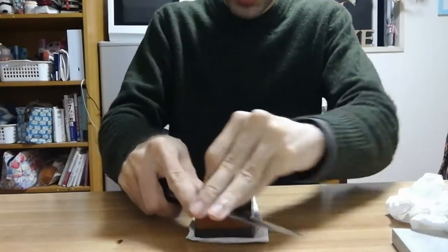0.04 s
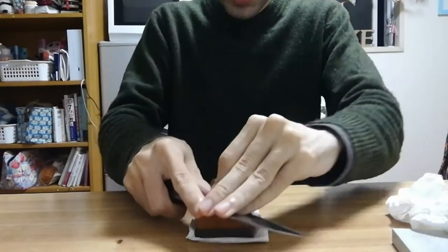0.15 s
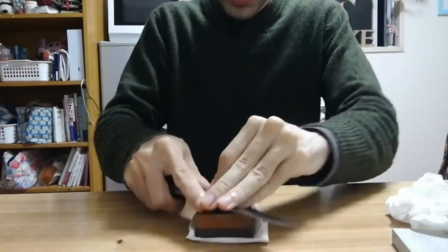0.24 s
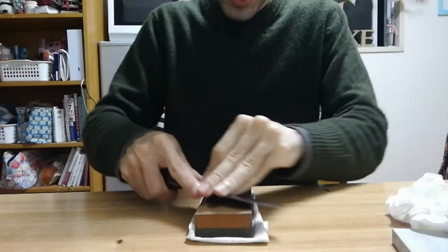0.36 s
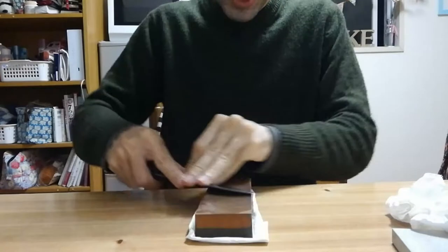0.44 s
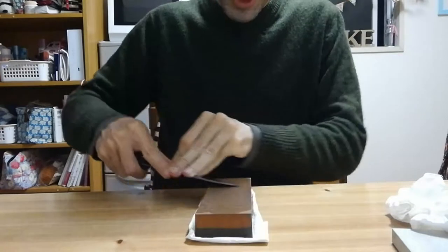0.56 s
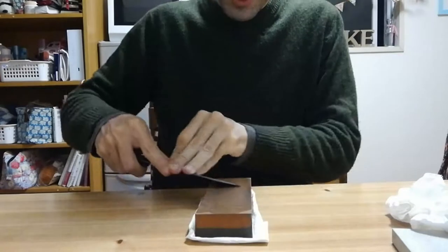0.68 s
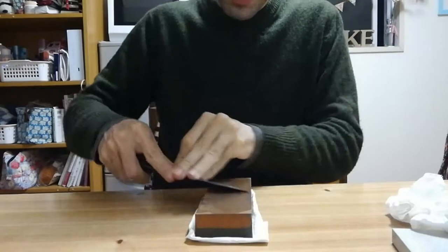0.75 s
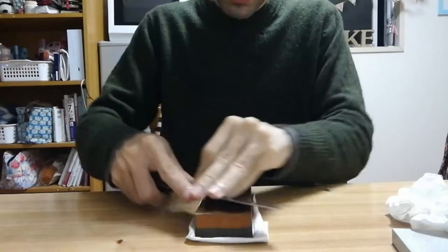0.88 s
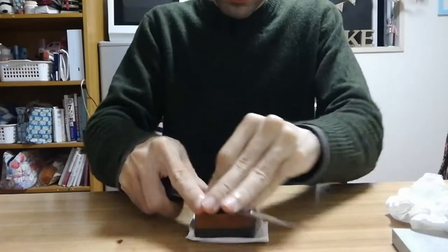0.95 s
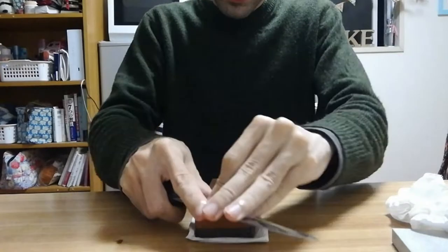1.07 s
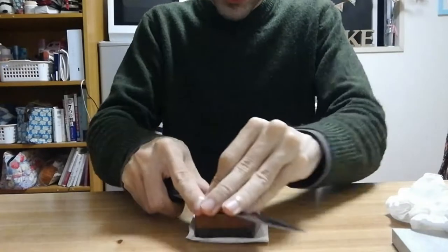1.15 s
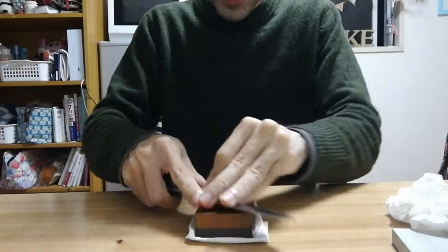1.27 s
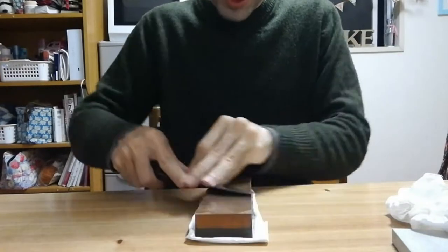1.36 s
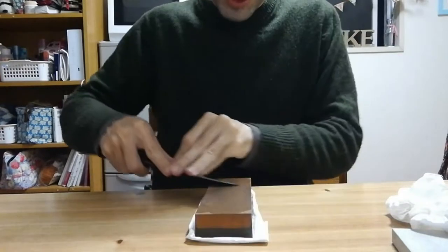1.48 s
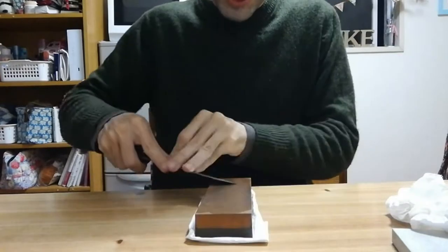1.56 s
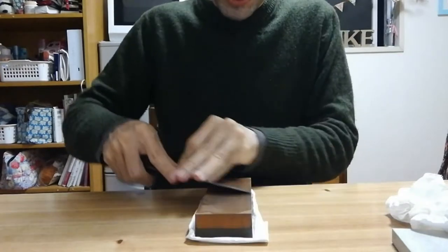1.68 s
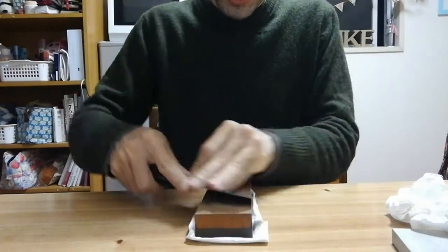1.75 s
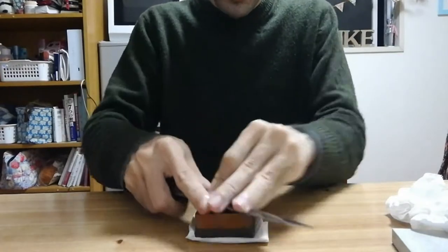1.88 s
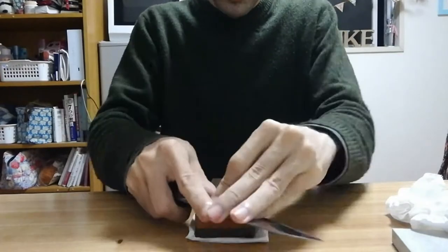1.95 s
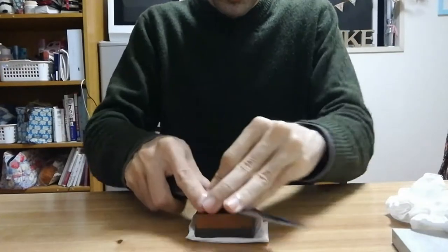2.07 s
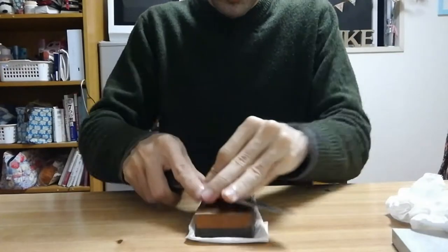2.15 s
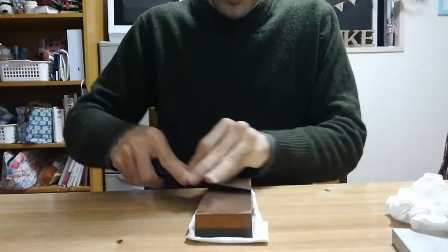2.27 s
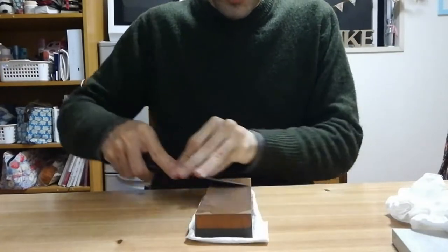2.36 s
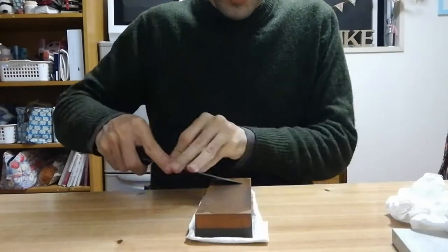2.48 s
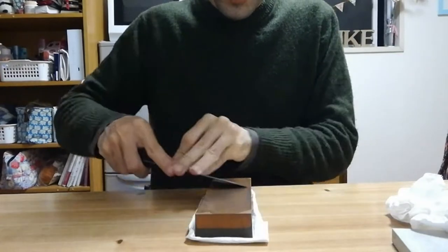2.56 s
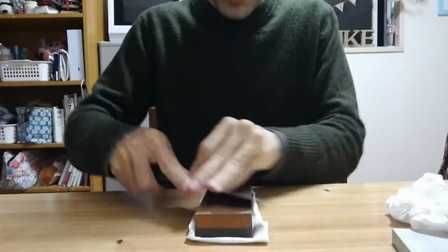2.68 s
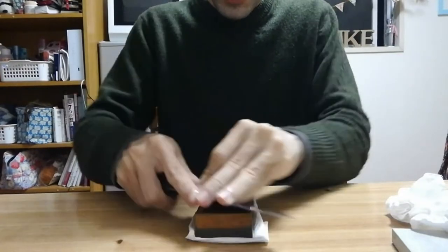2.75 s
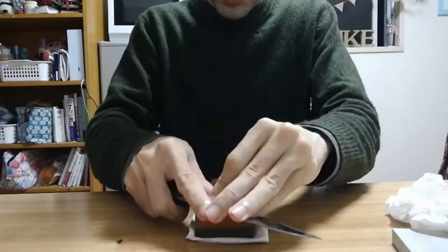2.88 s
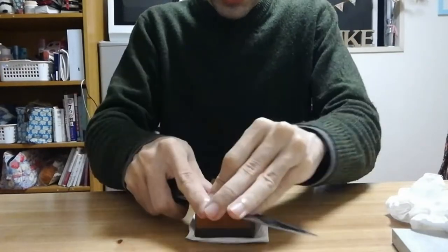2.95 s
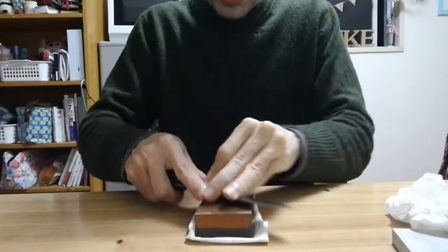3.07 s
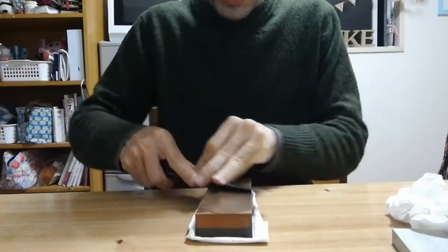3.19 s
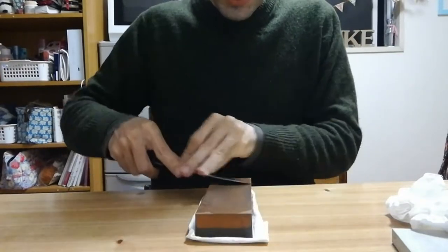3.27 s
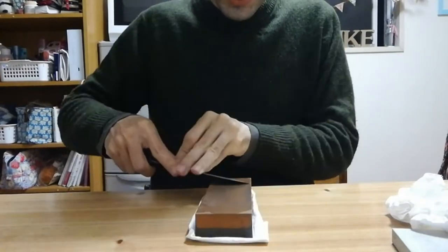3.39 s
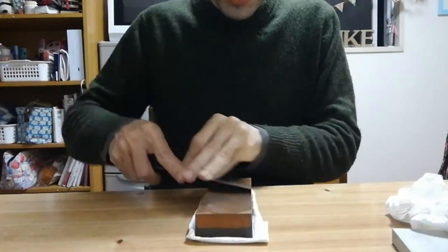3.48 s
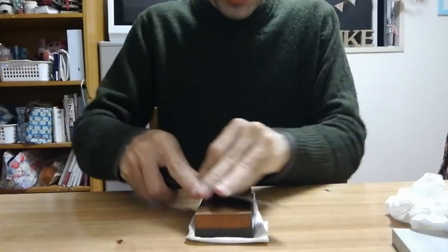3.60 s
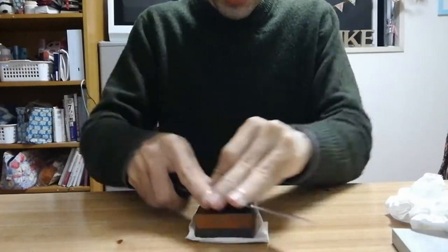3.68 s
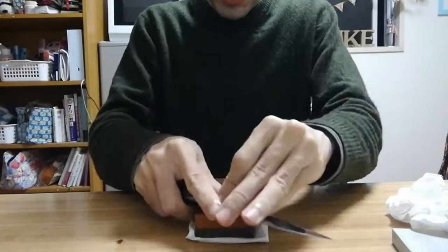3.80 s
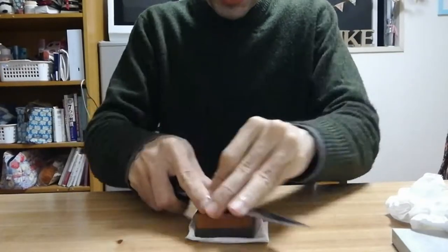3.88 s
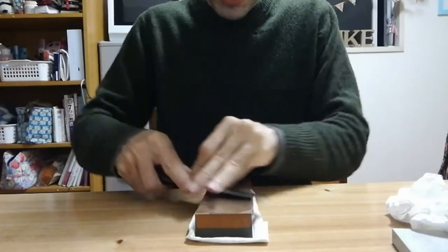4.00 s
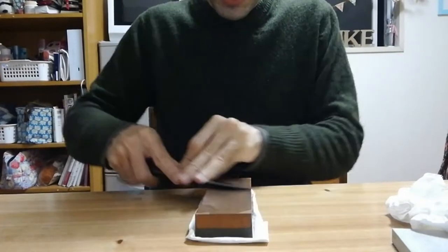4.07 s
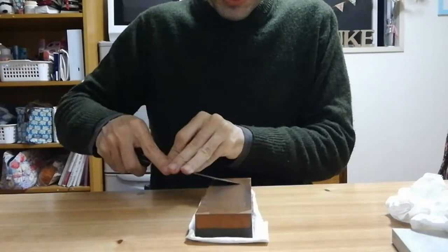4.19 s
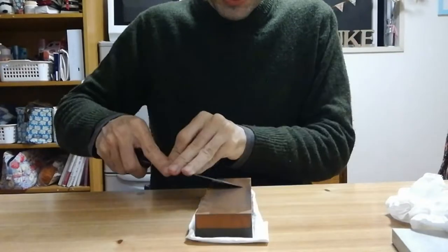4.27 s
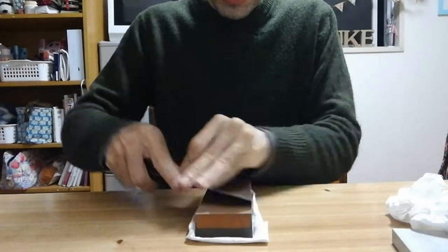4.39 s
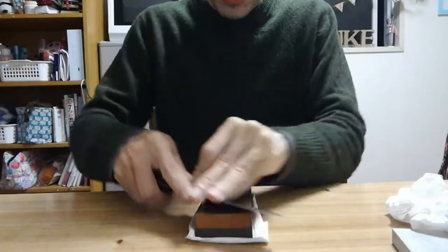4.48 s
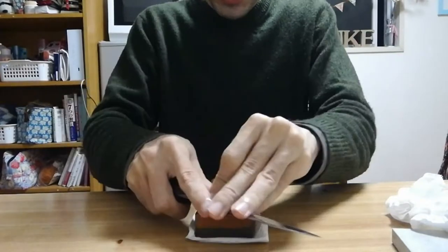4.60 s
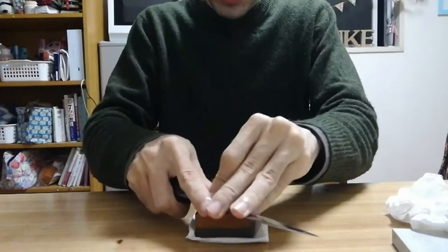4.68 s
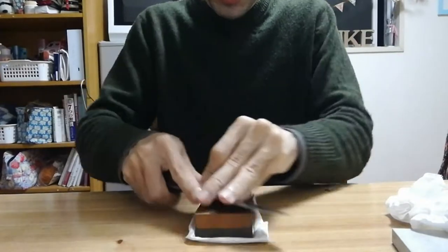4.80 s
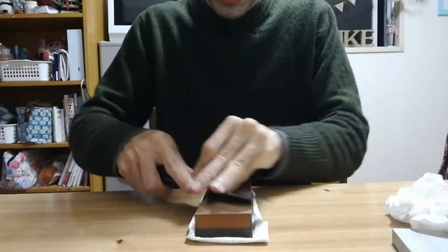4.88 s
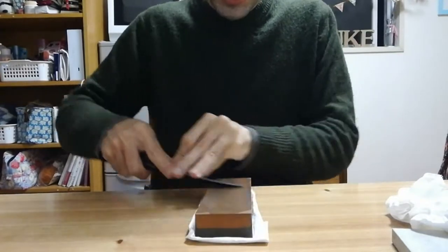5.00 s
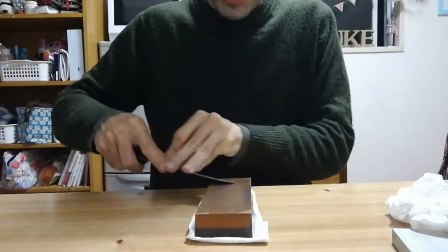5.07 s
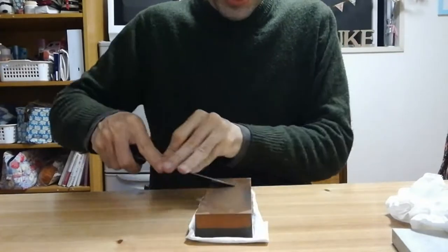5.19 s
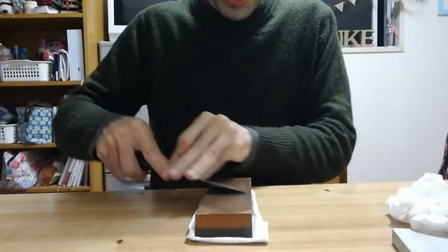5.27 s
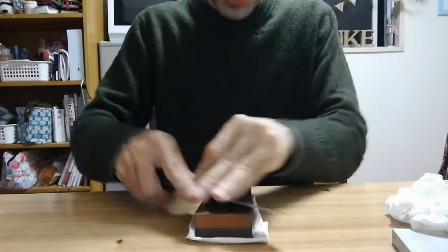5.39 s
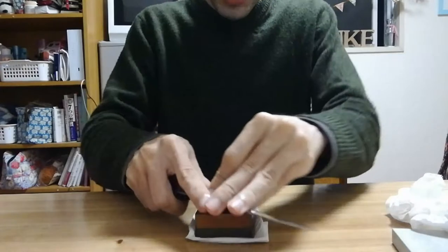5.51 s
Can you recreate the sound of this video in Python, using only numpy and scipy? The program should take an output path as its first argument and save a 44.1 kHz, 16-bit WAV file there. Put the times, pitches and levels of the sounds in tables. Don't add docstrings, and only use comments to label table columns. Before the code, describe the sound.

Close, hissy metallic strokes of a knife on a whetstone, about two per second, with short sliding ringing tones in a quiet room.

```python
import sys
import numpy as np
from scipy import signal
from scipy.io import wavfile
from scipy.ndimage import uniform_filter1d

SR = 44100
rng = np.random.default_rng(int(sys.argv[2]) if len(sys.argv) > 2 else 0)


def natural_amplitude(level_db):
    exponent = np.asarray(level_db, float) / 20
    return 10 ** exponent


def put_to_file(sound):
    columns = np.atleast_2d(sound).T
    safe = np.clip(columns, -1, 1)
    whole_steps = np.round(safe * 32767)
    wavfile.write(sys.argv[1], SR, whole_steps.astype(np.int16))


N = 244578

# f/Hz, level/dB
LEFT_EAR = [(1000, -28), (1350, -28), (1600, -21.5), (2200, -14), (3000, -9), (4500, -1.5), (6000, -8.5),
            (7500, -1), (8600, -1), (10500, -0.5), (12700, 1.5), (14000, -3.5), (15000, 5), (15700, -13)]
RIGHT_EAR = [(1000, -38), (1350, -38.5), (1600, -16.5), (2200, -11), (3300, -7), (4000, -2), (4800, -0.5),
             (6100, -10), (7500, -8), (8600, -7.5), (10000, -3), (12600, 0), (13900, 4.5), (15600, 1.5)]


def read(points, hz):
    f, value = np.transpose(points)
    return np.interp(np.log(hz + 1), np.log(f + 1), value)


def evened(x):
    return x / np.sqrt(np.mean(abs(x) ** 2) + 1e-20)


def drift(count, length, size):
    noise = rng.standard_normal((length, count))
    smooth = uniform_filter1d(uniform_filter1d(noise, size, 0), size, 0)
    return evened(smooth.T)


def resonate(x, hz, width_hz):
    carrier = np.exp(2j * np.pi * np.cumsum(hz) / SR)
    r = np.exp(-np.pi * width_hz / SR)
    return 2 * (carrier * signal.lfilter([1 - r], [1, -r], x / carrier)).real


def resonate_twice(x, hz, width_hz):
    return resonate(resonate(x, hz, width_hz), hz, 2 * width_hz)


def pair(first, second, likeness):
    return np.array([first, likeness * first + np.sqrt(1 - abs(likeness) ** 2) * second])


def bumps(t, events):
    return [(db, np.exp(-((t - at) / (length / 2)) ** 2)) for at, db, length in events]


def grit(per_s=18000, spread_db=.8, chatter_db=.7):
    size_db = spread_db * np.minimum(rng.exponential(1, (N, 2)), 5)
    size = natural_amplitude(size_db) * rng.standard_normal((N, 2))
    ticks = (size * (rng.random((N, 2)) < per_s / SR)).T
    return evened(ticks * natural_amplitude(chatter_db * drift(count=1, length=N, size=120)))


def rasp(ticks, wander_db=3.0, slide=0.019, patchy_db=3.76, gain_db=3.18, likeness=0.62, sway_rad=1.0):
    # edge ring/dB, blade ring/dB, spine ring/dB
    strokes = [
        [(0.0, -25, -5, -13, -21), (0.038, -22.5, -4, -9, -24), (0.08, -31.5, 0, -5, -14),
         (0.106, -50, -1, 2, -12), (0.13, -55, -11, -4, -19)],
        [(0.13, -47, -2, 5, -15), (0.164, -40, -6, -7, -18), (0.194, -22, 2, -7.5, -13.5),
         (0.248, -17, -2.5, -10, -12.5), (0.378, -13, -6.5, -9.5, -12.5), (0.42, -17, 0, -8.5, -15.5),
         (0.482, -19, -10, -3.5, -23), (0.512, -26.5, -3, -4, -24), (0.554, -32.5, 1.5, -3, -26),
         (0.63, -52, -1, 2, -17)],
        [(0.63, -51, 3, 0, -5), (0.678, -30, 3, -7, -33), (0.716, -28, -2.5, -2, -25),
         (0.808, -18.5, -1.5, -7.5, -16.5), (0.876, -23, -4, -17, -19.5), (0.956, -36, 5.5, 0, -19),
         (0.984, -28, -5, -14, -25), (1.022, -25.5, -9, -3.5, -34), (1.09, -52, -4, -7, -11)],
        [(1.09, -59, 11, -12, -24), (1.118, -33.5, -12, -3, -13), (1.138, -23.5, 3, -11, -15),
         (1.23, -16, 1, -6, -8), (1.276, -14, -7, -8, -17), (1.352, -15, -4, -10, -14),
         (1.402, -18, -11.5, -2.5, -22), (1.482, -27.5, -2.5, -8, -25), (1.54, -50, 6, 2, -15)],
        [(1.54, -52, 2, -1, -14), (1.578, -28, -2.5, -13, -34), (1.622, -29.5, 1, -8, -25),
         (1.674, -20, -8, -4.5, -29), (1.72, -16, -10, -11, -13), (1.748, -12, -3.5, -13, -17),
         (1.852, -19, -5, -10.5, -19), (1.95, -39.5, -4.5, -8.5, -20), (1.985, -50, -2, 3, -3)],
        [(1.985, -54, -4, -16, -27), (2.003, -32.5, -6, -6, -20), (2.029, -23.5, 1.5, -6.5, -10),
         (2.119, -16, 0, -8, -10), (2.233, -13.5, -7.5, -11, -20), (2.261, -16.5, -1.5, -8, -12),
         (2.289, -18.5, -1, -8, -15.5), (2.341, -21.5, -9, -6, -25), (2.403, -31.5, 5, 4, -16),
         (2.475, -49, 2, 1, -6)],
        [(2.475, -51, -2, -10, -10), (2.519, -29.5, 0, -4, -19), (2.611, -28, -1, -1, -21),
         (2.643, -16, -13.5, -11, -28), (2.669, -24, -9, -5, -18), (2.685, -13.5, -3.5, -9, -15),
         (2.885, -23.5, -3, -11.5, -18.5), (2.905, -35, 0, -3, -17), (2.92, -68, 0, -40, -34)],
        [(2.92, -44, 6, -25, -24), (2.932, -32, -8, -4, -8), (2.962, -23.5, -3, -8, -17.5),
         (3.016, -16, 3.5, -5, -11), (3.11, -15, -5, -9, -10.5), (3.18, -15.5, -0.5, -6.5, -20),
         (3.198, -17.5, -7.5, -7, -8), (3.322, -40, 4, 0.5, -28), (3.36, -51, 5, -5, -9)],
        [(3.36, -44, -5, -6, -15), (3.402, -33, 4, -1.5, -22), (3.502, -21.5, -6.5, -10, -22),
         (3.532, -18, -8, -8.5, -11.5), (3.566, -9.5, -9.5, -12.5, -19.5), (3.636, -15, 1.5, -8, -9),
         (3.68, -21, -6, -10.5, -26), (3.758, -35, -4, -1, -11), (3.78, -53, 5, -8, -12)],
        [(3.78, -42, -8, -11, -10), (3.81, -25, -5, -2, -17), (3.844, -19.5, 2.5, -6, -12),
         (3.91, -14.5, 0.5, -2, -10), (3.934, -18.5, 4, -9, -6), (3.956, -16, -2, -8, -12.5),
         (4.01, -12, -4.5, -11, -16), (4.156, -24.5, -4, -3.5, -22), (4.22, -50, 9, 2, -8)],
        [(4.22, -46, -2, 8, -4), (4.24, -34.5, 5, -3, -21), (4.41, -22, -3.5, -5, -21.5),
         (4.432, -21, -9, -7.5, -11.5), (4.474, -9.5, -5.5, -6.5, -17), (4.484, -13.5, 2.5, -10, -9),
         (4.58, -18, 3.5, -5, -18), (4.628, -32, 0.5, -5, -10), (4.655, -54, 9, -5, 4)],
        [(4.655, -50, -1, -5, 3), (4.675, -28.5, -6, -9, -13), (4.709, -20.5, 0, -6, -12),
         (4.775, -16.5, 0, -9.5, -15.5), (4.865, -14, -8, -13, -17), (4.889, -14, -1, -9.5, -16),
         (4.945, -19.5, -6, -11, -19), (4.959, -18.5, -7.5, -8, -21.5), (5.045, -29.5, 1.5, -5, -24),
         (5.14, -50.5, 1, 0, -22)],
        [(5.14, -55, -1, -1, -10), (5.184, -35, 3, -3.5, -18), (5.328, -21.5, -4.5, -3.5, -23.5),
         (5.366, -20.5, -8.5, -5, -16), (5.412, -11, -3, -11, -17), (5.458, -15, 3.5, -5.5, -7),
         (5.49, -21, -8, -12, -22), (5.53, -24.5, 9.5, 2, -9), (5.546, -28, -5, -14, -20)],
    ]
    layer_hz = (2000, 3900, 7200, 11500)
    # f/Hz, width/Hz, level over the rasp/dB
    blade_modes = [(1640, 330, 4.5), (2150, 324, 6.5), (2486, 164, 1), (2950, 330, 5), (3400, 157, 4.5),
                   (3953, 74, 3.5), (4780, 165, -3), (5090, 49, 2), (5660, 360, 6), (6240, 390, 11.5),
                   (6765, 47, 12.5), (7305, 320, 7), (7700, 140, 7), (8140, 86, 7), (9020, 360, 6)]
    # f/Hz, width/Hz, depth/dB
    bounce_dips = [(1880, 130, 10), (2790, 140, 8), (3600, 130, 6), (4220, 200, 5), (5850, 150, 4)]
    # f/Hz, phase/rad
    phase_turn = [(1500, 0.1), (2400, -.3), (2800, -2.3), (3100, 0.1), (3550, -1.9), (3850, .6),
                  (4250, 3.1), (4750, 6.2), (5700, 4.3), (6800, 5.6), (8000, 6.3), (8700, 3.2),
                  (11500, 4.4), (13500, 6.3)]
    # t/s, level/dB, length/s
    bites = [
        (0.818, 2, 0.014),
        (1.943, 14.5, 0.024),
        (2.756, 1.5, 0.023),
        (2.8, -6.5, .07),
        (2.84, 10, 0.0012),
        (3.37, 6, 0.011),
        (3.748, 8.5, .025),
        (4.552, 0.5, 0.037),
        (1.133, 3.5, 0.018),
        (2.511, 5.5, 0.017),
    ]

    hz, t, z = signal.stft(ticks, SR, nperseg=1024, noverlap=896)
    f_bin = hz[:, None]
    s, hiss_db, *ring_db = np.transpose(np.concatenate(strokes))

    swell = drift(count=len(blade_modes), length=len(t), size=14)
    shift = drift(count=len(blade_modes), length=len(t), size=40)
    power = 1
    for k, (f, width, db) in enumerate(blade_modes):
        offset = 2 * (f_bin - f * (1 + slide * shift[k])) / width
        power = power + natural_amplitude(2 * (db + wander_db * swell[k])) / (1 + offset ** 2)
    for (f, width, db), move in zip(bounce_dips, drift(count=len(bounce_dips), length=len(t), size=25)):
        offset = 2 * (f_bin - f * (1 + 0.045 * move)) / width
        power = power * natural_amplitude(-2 * db * (1 + move / 2) / (1 + offset ** 2))

    patches = np.array([evened(uniform_filter1d(drift(count=len(hz), length=len(t), size=16), 3, 0))
                        for _ in range(2)])
    ears_db = np.array([read(LEFT_EAR, hz), read(RIGHT_EAR, hz)])[:, :, None]
    colour = np.sqrt(power) * natural_amplitude(ears_db + patchy_db * patches)

    layers_db = np.array([np.interp(t, s, c) for c in ring_db[::-1]] + [0 * t])
    layers_db -= layers_db.mean(1, keepdims=True)
    blend = np.array([np.interp(np.log(hz + 1), np.log(layer_hz), row) for row in np.eye(len(layer_hz))])
    colour *= natural_amplitude(blend.T @ layers_db)
    top = colour[:, hz > 9000]
    colour /= np.sqrt((top ** 2).mean(0).sum(0).mean() / len(hz))

    sway = evened(uniform_filter1d(drift(count=len(hz), length=len(t), size=40), 16, 0))
    phase = read(phase_turn, hz)[:, None] + sway_rad * sway
    spectra = pair(*z, likeness * np.exp(1j * phase)) * colour
    both = signal.istft(spectra, SR, nperseg=1024, noverlap=896)[1][:, :N]

    now = np.arange(N) / SR
    bite_db = sum(db * course for db, course in bumps(now, bites))
    return both * natural_amplitude(np.interp(now, s, hiss_db) + bite_db + gain_db)


def rings(ticks, width_hz=70, broken_db=3):
    # start/s, end/s, f/Hz, level/dB rms
    free_modes = [(0.187, 0.268, 1625, -37.5), (1.122, 1.195, 1625, -44.5), (1.776, 1.845, 1644, -38),
                  (2.04, 2.205, 1650, -49), (2.795, 2.91, 1595, -43), (2.948, 3.05, 1640, -38),
                  (3.617, 3.655, 1630, -31), (3.73, 3.753, 1450, -44), (3.84, 3.91, 1680, -39),
                  (4.497, 4.632, 1570, -37.5), (4.663, 4.746, 1620, -44), (5.447, 5.472, 1567, -30),
                  (5.5, 5.55, 1590, -45), (0.0, 0.084, 2150, -47), (0.826, 0.884, 2150, -50),
                  (0.98, 1.068, 2150, -45), (1.913, 1.953, 2140, -45), (2.09, 2.172, 2290, -35),
                  (2.503, 2.624, 2480, -47), (2.79, 2.9, 2360, -42), (4.22, 4.36, 2270, -47),
                  (.36, 0.438, 3170, -26.5), (1.733, 1.765, 3050, -26), (2.68, 2.715, 2950, -27),
                  (4.44, 4.477, 2950, -23), (5.392, 5.42, 2880, -24.5), (2.502, 2.628, 4830, -36),
                  (2.778, 2.9, 4650, -31.5), (2.966, 3.055, 7240, -23), (1.283, 1.375, 7700, -23.5)]
    out = np.zeros((2, N))
    broken = natural_amplitude(broken_db * drift(count=1, length=N, size=400)[0])
    for start, end, hz, db in free_modes:
        at = np.arange(max(round(start * SR), 0), min(round(end * SR), N))
        pitch = np.full(len(at), float(hz))
        ring = evened(resonate_twice(ticks[0, at], pitch, width_hz * np.sqrt(hz / 1600)) * broken[at])
        ring = natural_amplitude(db) * ring * signal.windows.tukey(len(at), .4)
        lean_db = (read(LEFT_EAR, hz) - read(RIGHT_EAR, hz)) / 2
        out[:, at] += natural_amplitude(np.array([[lean_db], [-lean_db]])) * ring
    return out


def walls(x, t60_s=0.28, wet_db=-16):
    t = np.arange(SR // 3) / SR
    tail = rng.standard_normal((len(t), 2)).T * natural_amplitude(-60 * t / t60_s) * (t > .006)
    return natural_amplitude(wet_db) * signal.fftconvolve(x, tail / np.linalg.norm(tail[0]), axes=1)[:, :N]


def room(floor_db=-41):
    # f/Hz, likeness
    ear_likeness = [(60, 0.93), (130, 1.0), (290, 0.79), (640, -1.02), (1410, 0.81), (3100, 0.23),
                    (6820, -0.65), (15000, 1)]
    # f/Hz, level/dB per Hz
    floor_spectrum = [(12, -61), (20, -19), (48, -28.5), (70, -12.5), (113, -10), (220, -10), (481, -23),
                      (553, -18), (654, -24.5), (1790, -32), (2790, -61), (4240, -51), (4740, -56),
                      (15800, -56)]
    # f/Hz, width/Hz, level/dB rms
    drone_modes = [(187.2, 19, -50), (318, 26, -52)]
    # f/Hz, level/dB rms
    hum_tones = [(100, -32.5), (143.6, -51)]

    hz, _, z = signal.stft(rng.standard_normal((N, 2)).T, SR, nperseg=2048)
    likeness = np.clip(read(ear_likeness, hz), -1, 1)[:, None]
    spectra = pair(*z, likeness) * natural_amplitude(read(floor_spectrum, hz))[:, None]
    floor = signal.istft(spectra, SR, nperseg=2048)[1][:, :N]

    drones = sum(natural_amplitude(db) * evened(resonate_twice(rng.standard_normal(N), np.full(N, f), width))
                 for f, width, db in drone_modes)

    t = np.arange(N) / SR
    waver = drift(count=len(hum_tones), length=N, size=6000)
    hum = 0
    for k, (f, db) in enumerate(hum_tones):
        level_db = db + 0.22 * (2 + 6.2 * k) * waver[k]
        hum = hum + np.sqrt(2) * natural_amplitude(level_db) * np.sin(2 * np.pi * (f * t + rng.random()))
    return natural_amplitude(floor_db) * evened(floor) + drones + hum


def tip(ticks, sharp=13, ripple_db=3.5, ripple_hz=275, fade_db=10, broken_db=2.5):
    # t/s, f/Hz, level/dB
    glides = [
        [(.24, 850, -53), (.275, 890, -46), (.32, 1110, -51), (.38, 1530, -33), (.45, 2100, -52),
         (.55, 3180, -52)],
        [(.68, 3260, -52), (.76, 2440, -50), (.8, 1630, -48), (.82, 1110, -36), (.85, 950, -65)],
        [(1.2, 900, -51), (1.235, 970, -59), (1.29, 1350, -42), (1.36, 2070, -39), (1.46, 3160, -57)],
        [(1.62, 3200, -49), (1.7, 2170, -40), (1.735, 1740, -48), (1.755, 1130, -48), (1.78, 960, -55)],
        [(2.12, 890, -35), (2.15, 920, -60), (2.22, 1350, -35.5), (2.29, 2150, -44), (2.4, 3200, -48)],
        [(2.6, 2950, -30), (2.67, 2140, -33), (2.7, 1265, -38), (2.72, 914, -31.5), (2.745, 875, -66)],
        [(3.06, 950, -52), (3.09, 990, -40), (3.15, 1360, -38), (3.21, 2190, -42), (3.3, 3170, -67)],
        [(3.46, 2900, -49), (3.53, 1850, -39), (3.58, 1190, -36.5), (3.6, 990, -42), (3.62, 900, -55)],
        [(3.92, 960, -57), (3.97, 1270, -34), (4.03, 1750, -51), (4.08, 2320, -39), (4.17, 3300, -57)],
        [(4.36, 3140, -44), (4.43, 2250, -34), (4.46, 1370, -44), (4.49, 980, -39), (4.52, 900, -49)],
        [(4.82, 1150, -50), (4.85, 1250, -42), (4.92, 2150, -32), (4.99, 2460, -47), (5.07, 3400, -63)],
        [(5.28, 3050, -33), (5.36, 2140, -41), (5.4, 1530, -32), (5.43, 1080, -63), (5.46, 950, -55)],
    ]
    out = np.zeros(N)
    broken = drift(count=1, length=N, size=350)[0]
    for rows in glides:
        s, hz, db = np.transpose(rows)
        at = np.arange(round(s[0] * SR), round(s[-1] * SR))
        pitch = np.exp(np.interp(at / SR, s, np.log(hz)))
        ring = evened(resonate_twice(ticks[0, at], pitch, hz.mean() / sharp))
        level_db = np.interp(at / SR, s, db) + ripple_db * np.cos(2 * np.pi * pitch / ripple_hz)
        level_db += broken_db * broken[at] - fade_db * np.maximum(np.log2(pitch / 1400), 0)
        out[at] += natural_amplitude(level_db) * ring * signal.windows.tukey(len(at), .2)
    return out * natural_amplitude(np.array([[-1.5], [1.5]]))


def scuffs(ticks, low_hz=350, high_hz=1500):
    # t/s, level/dB, length/s
    catches = [
        (2.684, -47, 0.037),
        (3.017, -67, .015),
        (3.594, -44, 0.042),
        (3.916, -37, 0.016),
        (4.04, -58, 0.044),
        (4.493, -42, 0.032),
        (5.41, -39, 0.044),
    ]
    shape = sum(natural_amplitude(db) * course for db, course in bumps(np.arange(N) / SR, catches))
    band = signal.butter(2, [low_hz, high_hz], "band", fs=SR, output="sos")
    return shape * evened(signal.sosfilt(band, ticks))


def scene():
    ticks = grit()
    knife = rasp(ticks) + tip(ticks) + rings(ticks) + scuffs(ticks)
    return knife + walls(knife) + room()


def roll_off(x):
    return signal.sosfilt(signal.butter(12, 15900, fs=SR, output="sos"), x)


def record(dry):
    x = np.clip(dry, -1.1, 1.1)
    edge = signal.firwin(1535, 15815, window=("kaiser", 8), fs=SR)
    return roll_off(signal.oaconvolve(x, edge[None], "same"))


dry = scene()
out = record(dry)
put_to_file(out)
```